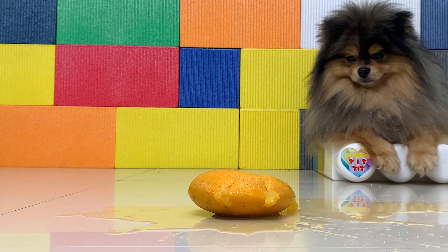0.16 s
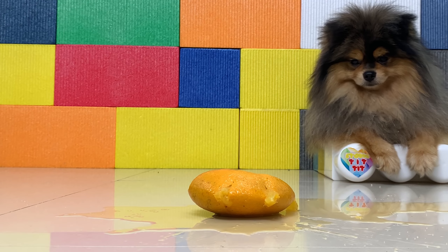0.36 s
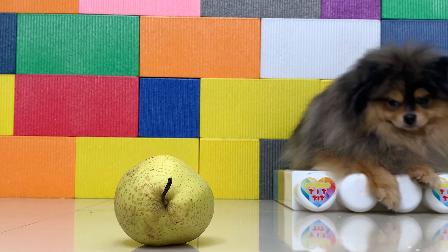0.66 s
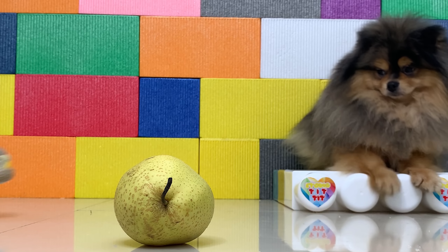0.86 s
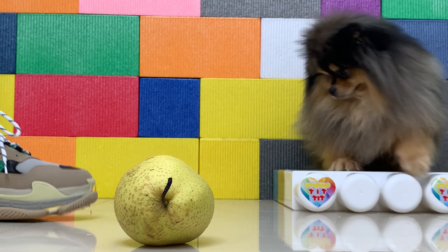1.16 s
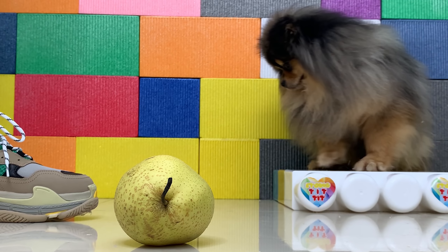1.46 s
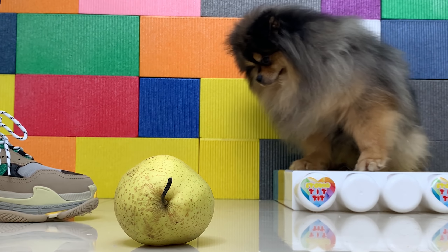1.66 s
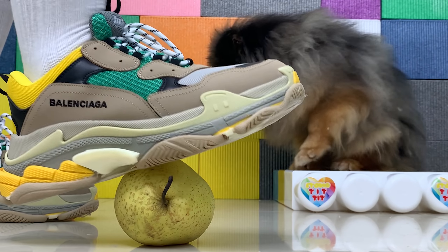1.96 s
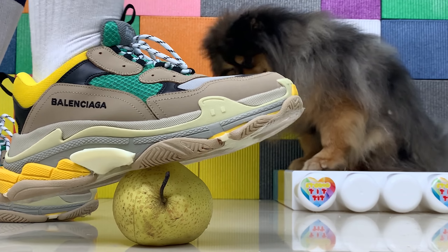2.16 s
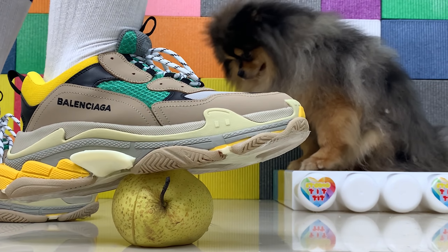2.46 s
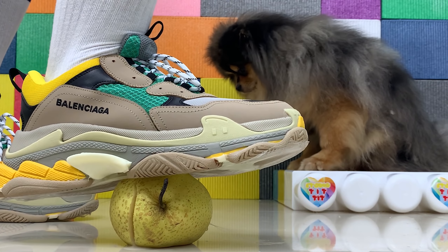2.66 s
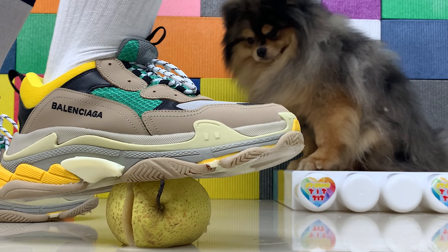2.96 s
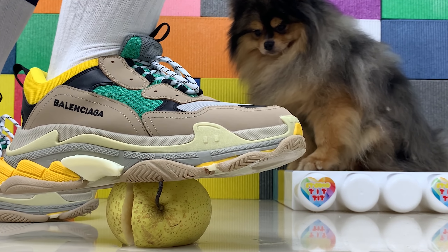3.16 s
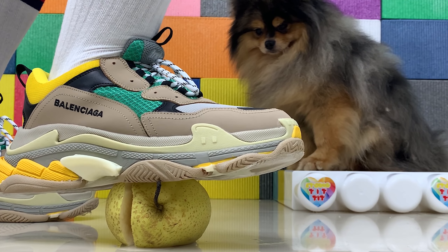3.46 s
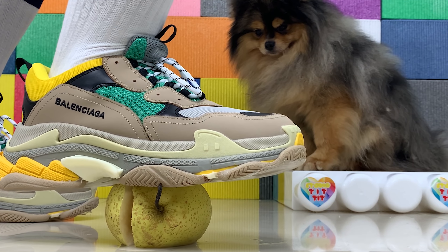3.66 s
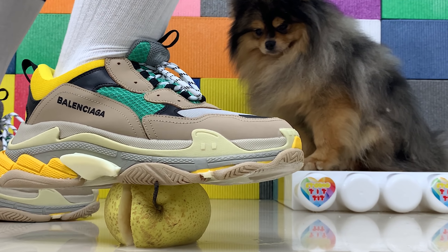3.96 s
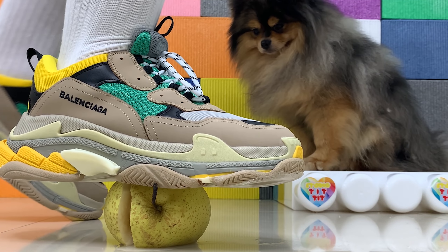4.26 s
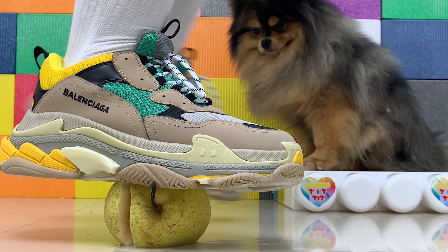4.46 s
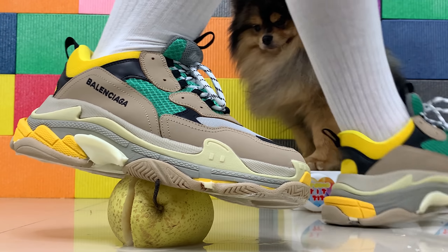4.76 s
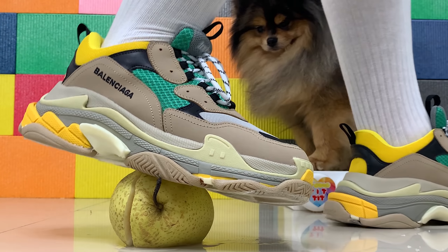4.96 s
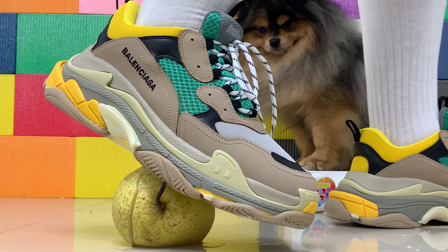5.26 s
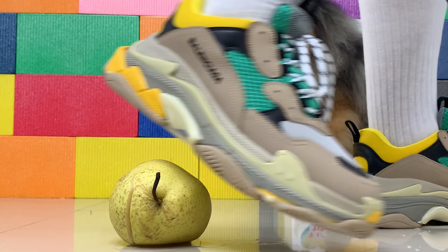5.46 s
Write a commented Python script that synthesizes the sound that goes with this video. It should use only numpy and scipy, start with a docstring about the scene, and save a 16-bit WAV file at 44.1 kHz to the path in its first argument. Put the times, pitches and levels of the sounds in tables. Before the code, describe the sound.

Soft footsteps and a hard tap, then a crisp fruit cracks and crunches under a shoe in bursts, close up in a live bare room.

```python
"""A thick-soled shoe presses a firm pear on a hard floor, close to the microphones in a live room.
Surges of weight crush the flesh: short pops and noise bursts split it, dense grains crumble and fizz.
A faint juicy fizz comes first, from fine grains; steps, taps and rustling are shaped noise.
Two wavering low tones, a low rumble and a faint hiss lie beneath."""
import sys
import numpy as np
from scipy import signal
from scipy.fft import rfft, irfft, next_fast_len
from scipy.io import wavfile
from scipy.ndimage import map_coordinates

SR = 44100
rng = np.random.default_rng(int(sys.argv[2]) if len(sys.argv) > 2 else 0)


def log_audio(samples):
    """Write samples as a 16-bit WAV file to the path given in sys.argv[1]."""
    # one column per channel
    frames = np.atleast_2d(samples).T
    # limit to full scale, then quantise
    limited = np.clip(frames, -1, 1)
    pcm = np.round(limited * 32767).astype(np.int16)
    wavfile.write(sys.argv[1], SR, pcm)


N = 247786

# Relative dB below: a level that is trimmed, shaped or normalised further on.

# Surges of weight on the fruit. Each row: peak in seconds, rise in seconds, fall in seconds,
# pulp crunch in relative dB, juice fizz in relative dB.
SURGES = [(2.61, 0.089, 0.07, -52.5, -38), (2.85, 0.06, 0.21, -44.5, -38.5),
          (3.01, 0.15, 0.04, -47.5, -40.5), (3.44, 0.026, .025, -61, -50.5), (3.72, 0.019, 0.012, -44, -42),
          (3.94, 0.021, 0.077, -47.5, -42.5), (4.05, 0.023, .02, -46.5, -48),
          (4.18, 0.03, 0.087, -57, -52.5), (4.73, 0.0235, 0.13, -42.5, -36.5),
          (4.86, 0.029, 0.024, -39.5, -34), (4.99, .02, 0.039, -49, -57)]
# Full load between these times, ramped outside them.
LOAD_FULL_S, LOAD_END_S, LOAD_RAMP_S = 2.45, 5.1, 0.2


def pressing(load_pulp_rel_db=-63.5, load_juice_rel_db=-59):
    """Gains of pulp crunch and juice fizz: a steady load with surges of weight on top."""
    t = np.arange(N) / SR
    inside_s = np.minimum(t - LOAD_FULL_S, LOAD_END_S - t)
    loaded = np.clip(1 + inside_s / LOAD_RAMP_S, 0, 1)
    steady = amp([[load_pulp_rel_db], [load_juice_rel_db]])
    return loaded * np.sqrt(steady ** 2 + swells(SURGES))


# Loudest splits in the flesh. Each row: centre in seconds, pop in relative dB, pop pitch in Hz,
# bursting cells in relative dB, tearing time in seconds.
CRACKS = [(2.603, -40.5, 2310, -31, .0015), (2.6368, -39, 2880, -30.5, .0009),
          (2.693, -41, 2780, -34, .0008), (2.7195, -64, 3190, -38, .001), (2.7412, -31, 2480, -28, 0.0018),
          (2.7549, -18.5, 4230, -22.5, 0.00047), (2.7658, -25.5, 3030, -25.5, 0.00087),
          (2.799, -35.5, 2640, -33.5, 0.0011), (2.8296, -21, 2500, -20.5, 0.00028),
          (2.8366, -19.5, 2480, -20.5, 0.0023), (2.846, -28, 2400, -26, 0.0013),
          (2.8567, -22, 2180, -19.5, .0015), (2.8854, -17, 4220, -21, 0.001),
          (2.8906, -29, 3720, -28.5, .0008), (2.932, -30.5, 2500, -33, 0.0016),
          (2.9566, -28.5, 2320, -43.5, .0014), (2.97, -31.5, 2200, -31.5, 0.00065),
          (3.017, -34, 3150, -32, 0.00045), (3.078, -38, 2300, -39, 0.0021),
          (3.2731, -44, 2290, -37.5, 0.00061), (3.3375, -39, 2220, -35, 0.001),
          (3.5446, -23.5, 2270, -24.5, 0.0011), (3.554, -29.5, 2570, -28, 0.0011),
          (3.7151, -44, 1780, -41.5, .001), (3.837, -37, 2970, -33, 0.00061),
          (3.9082, -40, 2710, -38, 0.0038), (3.9236, -34.5, 2160, -39, 0.0008),
          (4.0598, -37, 2300, -40, 0.0053), (4.2899, -44.5, 1700, -48.5, 0.0017),
          (4.383, -44, 3320, -42.5, 0.0016), (4.5381, -43, 1870, -43, 0.00043),
          (4.6017, -41.5, 3010, -39, 0.00062), (4.6317, -32, 2030, -37, .0015),
          (4.694, -48, 2190, -38, 0.0019), (4.7273, -28, 2550, -37, 0.0015),
          (4.7472, -27.5, 1780, -29, 0.00073), (4.773, -31.5, 1300, -27.5, 0.0016),
          (4.8027, -26, 2800, -25, 0.00062), (4.8253, -34.5, 1880, -24, 0.00091),
          (4.8384, -23, 2540, -17.5, 0.00085), (4.8516, -26.5, 3770, -22.5, 0.00096),
          (4.8581, -27, 1970, -28.5, 0.0019), (4.8816, -23.5, 1600, -26, .0025),
          (4.9079, -23, 2750, -19.5, 0.00082)]


def cracks(press, pop_db=-3, cells_db=0, small_pop_db=2, small_cells_db=3.0, scatter_db=6,
           small_hz=2300, small_tear_s=0.0004, count=320):
    """The big splits, plus small ones at random times whose levels follow the pressure."""
    rows = [(s, db + pop_db, hz, burst_db + cells_db, tear_s) for s, db, hz, burst_db, tear_s in CRACKS]
    times = rng.uniform(LOAD_FULL_S - LOAD_RAMP_S, LOAD_END_S + LOAD_RAMP_S, count)
    traits = np.tanh(rng.standard_normal((count, 4)))
    for s, (size, pitch, wet, length) in zip(times, traits):
        now = min(int(s * SR), N - 1)
        crunch_db, fizz_db = 20 * np.log10(press[:, now] + 1e-9)
        db = crunch_db + small_pop_db + scatter_db * size
        burst_db = fizz_db + small_cells_db + scatter_db * (size + wet) / 2
        hz = small_hz * np.exp(0.45 * pitch)
        rows.append((s, db, hz, burst_db, small_tear_s * np.exp(length / 2)))
    out = np.zeros((2, N))
    for s, *shape in rows:
        sound = crack(*shape)
        add(out, s - sound.shape[1] / 2 / SR, sound)
    return out


# Spectrum of bursting cells. Each row: frequency in Hz, level in relative dB.
CELLS = [(1500, -11), (3500, -2), (5000, -3), (6500, -2), (8200, -1), (10000, -1.5), (13000, -4.5),
         (16000, -6.5)]


def crack(db, hz, burst_db, tear_s, cycles=1.107, rise_share=0.7, skirt_db=-19, skirt_s=0.0053,
          tint_hz=7000, tint_db=2):
    """A split races through a cluster of cells; the freed flesh springs apart with a short pop."""
    t = (np.arange(1024) - 512) / SR
    sign, place = rng.choice([-1, 1]), rng.standard_normal()
    age_s = np.maximum(t + 0.74 / hz, 0)
    pop_envelope = (hz * age_s) * np.exp(-np.e * hz * age_s / cycles)
    pop = unit(np.sin(2 * np.pi * hz * age_s) * pop_envelope)
    # main tear: a sharp noise burst, with a weaker noise skirt that swells in and dies away
    steepness = 2 * t / tear_s / np.where(t < 0, rise_share, 1)
    tearing = 1 / np.cosh(np.clip(steepness, -20, 20))
    tearing = tearing + amp(skirt_db) * np.exp(-np.abs(t) / skirt_s)
    # each cluster has its own colour
    own_hz = tint_hz * np.exp(1.24 * place)
    tint = lambda f: 1 + amp(tint_db) * band(f, own_hz, own_hz / 3)
    bursts = filtered(tearing * rng.standard_normal((2, len(t))), tint)
    cells = off_floor(coloured(spread(bursts), CELLS))
    to_level = np.sqrt(88 / len(t))  # levels as if all energy fell within 2 ms
    return to_level * (sign * amp(db) * pop + amp(burst_db) * cells)


def off_floor(x, delay_s=0.0003214, bounce_db=-7):
    """A copy bounces off the floor; its delay, drawn per burst, notches the spectrum."""
    late_s = delay_s * np.exp(0.473 * rng.standard_normal())
    gain = amp(bounce_db)
    return filtered(x, lambda f: (1 + gain * np.exp(-2j * np.pi * f * late_s)) / np.hypot(1, gain))


# Spectrum of crushed pulp. Each row: frequency in Hz, level in relative dB.
PULP = [(100, -32.5), (400, -24), (900, 5.5), (1300, -1), (1800, 7), (2500, 4.5), (3300, -8), (4500, -21.5),
        (7000, -11.5)]
# Spurts of juice through crumbling flesh. Each row: centre in seconds, half length in seconds,
# level in relative dB.
SPURTS = [(2.627, 0.0069, -42.5), (2.665, 0.0077, -39.5), (3.012, 0.007, -37), (3.818, 0.03, -49),
          (4.693, 0.014, -38), (4.835, 0.0025, -34)]


def crushing(press, pulp_db=-7, juice_db=-4.0, spurt_pulp_db=-9, clump_db=1.0, clumps_per_second=130,
             crumble_db=-15, crumble_rise_s=0.0059, crumble_fall_s=0.0091):
    """Under pressure cells give way in clumps and juice fizzes; the crackle swells at each big split."""
    t = np.arange(N) / SR
    crumbs = swells([(s, crumble_rise_s, crumble_fall_s, db + crumble_db, burst_db + crumble_db)
                     for s, db, _, burst_db, _ in CRACKS])
    crunch, fizz = np.sqrt(press ** 2 + crumbs)
    clumps = amp(clump_db * map_coordinates(rng.standard_normal(4096), [t * clumps_per_second]))
    spurt = sum(amp(db) * np.exp(-((t - s) / half_s) ** 2) for s, half_s, db in SPURTS)
    pulp_gain = amp(pulp_db) * crunch + amp(spurt_pulp_db) * spurt
    pulp = pulp_gain * grains(PULP, per_second=1800, scatter_db=3.5)
    juice = amp(juice_db) * fizz * grains(CELLS, per_second=5400, scatter_db=5.5)
    spray = spurt * grains(CELLS, per_second=6700, scatter_db=0.5)
    return clumps * (pulp + juice) + spray


# Resonances of the split's hollow. Each row: time in seconds, then first, second and third
# resonance in Hz.
HOLLOW = [(2.95, 2230, 4130, 7740), (3.35, 1710, 3900, 8200), (4.5, 1760, 2800, 7900),
          (4.75, 1560, 2860, 6400)]
# Shape of those three resonances. Each row: width in Hz, gain in dB.
HOLLOW_RING = [(300, 0.5), (550, -10.5), (900, -7.5)]


def hollow(x):
    """The widening split lends its shifting resonances to everything that bursts inside it."""
    out = np.zeros_like(x)
    t, times = np.arange(N) / SR, np.transpose(HOLLOW)[0]
    for (s, *pitches), mine in zip(HOLLOW, np.eye(len(HOLLOW))):
        ring = lambda f: 1 + sum(amp(db) * band(f, hz, width_hz)
                                 for hz, (width_hz, db) in zip(pitches, HOLLOW_RING))
        out += filtered(x * np.interp(t, times, mine), ring)  # crossfade between rows
    return out


# Level difference of the ports. Each row: frequency in Hz, left over right in dB.
LEFT_BIAS = [(100, -2), (700, 0.5), (2200, 1), (4400, 3.5), (8000, 0.5), (15000, -0.5)]
# Phase difference of the ports. Each row: frequency in Hz, lead of left in radians.
LEFT_PHASE = [(1000, 0), (1550, .55), (2800, -.8), (3500, -1.1), (4700, -2.6), (6400, -6.1), (11000, -6.4),
              (15600, -6.9)]


def ports(x):
    """Two microphone ports hear the fruit with different strength and phase."""
    half = np.array([[0.5], [-0.5]])
    log_ratio = lambda hz: np.log(amp(along(LEFT_BIAS, hz))) + 1j * along(LEFT_PHASE, hz)
    return filtered(x, lambda hz: np.exp(half * log_ratio(hz)))


# Spectrum of fine juice bubbles. Each row: frequency in Hz, level in relative dB.
FOAM = [(1500, -14), (5000, -5), (8000, 0.5), (10000, 1.5), (13000, 2), (16000, -21)]
# Larger bubbles. Each row: peak in seconds, level in dB.
BUBBLES = [(0.297, -44), (.427, -43), (0.438, -42)]


def foam(full_s=0.28, end_s=0.39, rise_s=0.097, fall_s=0.096, foam_db=-56,
         bubble_rise_s=0.0006, bubble_fall_s=0.0029):
    """Tiny bubbles of juice burst, high and fine, with a few larger ones among them."""
    t = np.arange(N) / SR
    slope = np.minimum((t - full_s) / rise_s, (end_s - t) / fall_s)
    fizz = amp(foam_db) * np.exp(np.minimum(0, slope))
    bursts = sum(amp(db) * swell(s, bubble_rise_s, bubble_fall_s) for s, db in BUBBLES)
    return fizz * grains(FOAM, per_second=2700, scatter_db=5.5) + bursts * noise(FOAM)


# Soft blows of sole and fruit on the floor. Each row: start in seconds, peak in dB, pitch in Hz.
STEPS = [(1.063, -32, 980), (1.22, -49.5, 1430), (1.252, -58, 1010), (1.26, -40, 360), (1.622, -41, 900),
         (1.731, -41.5, 920), (1.897, -40.5, 358), (1.913, -38, 630), (1.954, -42.5, 394), (2.01, -53, 600),
         (2.125, -45.5, 700), (3.869, -42, 340), (4.06, -46, 348), (4.631, -38, 344), (4.777, -41, 300),
         (4.882, -24, 1260), (4.919, -39, 315), (5.411, -44, 745)]


def steps(t60_s=0.019, attack_s=0.0032, sharpness=4.3, step_db=0, overtone=2.0, overtone_db=-13):
    """Soft landing: a brief noise push through a broad resonance and a weaker one above it."""
    out, t = np.zeros(N), np.arange(SR // 8) / SR
    for s, db, hz in STEPS:
        push = rng.standard_normal(len(t)) * (1 - np.exp(-t / attack_s)) * amp(-60 * t / t60_s)
        low = lambda f: band(f, hz, hz / sharpness)
        high = lambda f: amp(overtone_db) * band(f, overtone * hz, overtone * hz / sharpness)
        thud = filtered(push, lambda f: (low(f) + high(f)) / (1 + 1j * f / (2 * hz)))
        add(out, s, amp(db + step_db) * thud / np.abs(thud).max())
    return np.array([out, out])


# Movements of legs and feet. Each row: peak in seconds, rise in seconds, fall in seconds,
# cloth rustle in relative dB, sole shuffle in relative dB.
MOVES = [(.04, 0.033, 0.084, -68.5, -58.5), (.13, 0.025, 0.32, -58, -60.5), (.43, 0.099, 0.057, -52, -77),
         (1.25, 0.046, 0.11, -59, -54.5), (1.44, 0.22, 0.12, -55.5, -75), (1.745, 0.018, 0.16, -53, -56.5),
         (1.95, 0.038, 0.23, -61.5, -52), (2.04, .013, 0.047, -56.5, -67), (3.88, 0.026, 0.22, -59, -57.5),
         (4.9, 0.13, 0.16, -64, -52.5), (5.36, 0.051, 0.23, -64.5, -72)]
# Spectrum of cloth. Each row: frequency in Hz, level in relative dB.
CLOTH = [(300, 6.5), (900, 7), (2000, 2.5), (4000, 3.5), (6500, -2), (8800, 1.5), (12500, -7),
         (16000, -3.5)]
# Spectrum of shuffling soles. Each row: frequency in Hz, level in relative dB.
SHUFFLE = [(120, -2.5), (250, 1.5), (450, -2), (800, -13), (1500, -23), (4000, -42)]


def rustling(press, rustle_db=0, shuffle_db=-1, still_cloth_db=-76, still_sole_db=-70, strain_db=-17):
    """Cloth whispers and soles shuffle with each movement; the sole also strains as it presses."""
    still = amp([[still_cloth_db], [still_sole_db]])
    cloth, sole = np.sqrt(swells(MOVES) + still ** 2)
    sole = np.hypot(sole, amp(strain_db) * press[0])
    rustle = amp(rustle_db) * cloth * grains(CLOTH, per_second=5000, scatter_db=5.0)
    return rustle + amp(shuffle_db) * sole * noise(SHUFFLE)


# Sharp taps further off in the room. Each row: start in seconds, peak in relative dB.
TAPS = [(.055, -40), (1.064, -48.5), (1.493, -38), (1.7315, -20.5), (1.915, -34), (2.11, -46.5),
        (2.145, -43.5), (2.371, -42), (5.34, -41)]
# Spectrum of a tap. Each row: frequency in Hz, level in relative dB.
TAP = [(300, 3.5), (900, -13.5), (1700, 4.5), (3200, -9), (5000, -5.5), (9000, -1.5), (16000, -7)]


def taps(t60_s=0.041, tap_db=-2):
    """Hard little contacts: coloured noise that dies quickly."""
    out, t = np.zeros((2, N)), np.arange(SR // 16) / SR
    for s, db in TAPS:
        hit = rng.standard_normal((2, len(t))) * amp(-60 * t / t60_s)
        tap = coloured(spread(hit), TAP)
        add(out, s, amp(db + tap_db) * tap / np.abs(tap).max())
    return out


# Colour of the room's answer. Each row: frequency in Hz, level in relative dB.
ROOM_COLOUR = [(100, -2.7), (600, 1.5), (1200, 0.6), (1800, -0.2), (3000, 1.4), (5000, 2.3), (6800, -5),
               (8200, 0.3), (9500, -3.5), (15000, 0.4)]
# Decay of the room. Each row: frequency in Hz, 60 dB decay time in seconds.
ROOM_DECAY = [(150, 1), (1000, 0.44), (3000, 0.83), (8000, .7), (15000, 0.45)]


def room(x, early_db, late_db, early_t60_s=0.055):
    """Floor, shoe and near wall scatter the sound at once; the bare room rings on."""
    hz, t, z = signal.stft(rng.standard_normal((2, SR)), SR, nperseg=256)
    decay = amp(-60 * t / along(ROOM_DECAY, hz)[:, None])
    tail = signal.istft(z * decay, SR, nperseg=256)[1][:, :SR]
    t = np.arange(SR) / SR
    late = tail * (1 - np.exp(-t / 0.0029))
    early = rng.standard_normal((2, SR)) * amp(-60 * t / early_t60_s) * (1 - np.exp(-t / 0.0019))
    answer = amp(early_db) * coloured(spread(early), ROOM_COLOUR)
    answer = answer + amp(late_db) * coloured(spread(late), ROOM_COLOUR)
    # the left channel alone drives both sides
    return signal.fftconvolve(x[:1], answer / np.sqrt(SR), axes=1)[:, :N]


# Level of the drone, fading early on. Each row: time in seconds, level in relative dB.
DRONE = [(0, -56), (.2, -51), (.55, -50.5), (.85, -61.5), (2.5, -62.5), (5.62, -64.5)]
# Tones of the drone. Each row: pitch in Hz, width in Hz, level in relative dB.
DRONE_TONES = [(57.5, 8.8, -2), (167.7, 9.1, -8.5)]


def drone():
    """Two wavering low tones: noise through narrow resonances."""
    tone = lambda hz, width_hz: unit(filtered(rng.standard_normal(N), lambda f: band(f, hz, width_hz) ** 2))
    tones = sum(amp(db) * tone(hz, width_hz) for hz, width_hz, db in DRONE_TONES)
    return amp(curves(DRONE)[0]) * tones


# Level of the low rumble. Each row: time in seconds, level in relative dB.
RUMBLE_LEVEL = [(0, -51.5), (.75, -63.5), (1.1, -53), (1.6, -55.5), (2.8, -55.5), (3.2, -57), (3.6, -66.5),
                (3.95, -52.5), (4.4, -57), (4.85, -51), (5.62, -57.5)]
# Spectrum of the rumble. Each row: frequency in Hz, level in relative dB.
RUMBLE = [(15, -40), (24, -8.5), (36, -3), (55, -1.5), (75, 0), (97, -1), (125, 1.5), (170, 1),
          (230, -13.5), (400, -19.5), (900, -45.5)]
# Spectrum of the hiss. Each row: frequency in Hz, level in relative dB.
HISS = [(200, 10.5), (1000, 4.5), (4000, -8), (16000, -27.5)]


def background(rumble_db=-2.0, hiss_db=-69.5):
    """Room rumble as low noise of varying level, plus a faint steady hiss."""
    rumble = amp(rumble_db + curves(RUMBLE_LEVEL)[0]) * noise(RUMBLE)
    return rumble + amp(hiss_db) * noise(HISS)


def amp(db):
    """Decibels to gain."""
    return 10 ** (np.asarray(db) / 20)


def unit(x):
    """Scale to rms 1."""
    return x / np.sqrt(np.mean(x ** 2) + 1e-20)


def along(points, hz):
    """Read (Hz, value) points on a log axis."""
    f, v = np.transpose(points)
    return np.interp(np.log(hz + 1), np.log(f + 1), v)


def curves(rows):
    """One value per sample for each column after the time."""
    s, *cols = np.transpose(rows)
    return [np.interp(np.arange(N) / SR, s, c) for c in cols]


def filtered(x, response):
    """x times a response of frequency."""
    n = x.shape[-1]
    m = next_fast_len(2 * n)
    return irfft(rfft(x, m) * response(np.fft.rfftfreq(m, 1 / SR)), m)[..., :n]


def band(f, hz, width_hz):
    """Response of one resonance, 1 at its centre."""
    return 1j * f * width_hz / (hz * hz - f * f + 1j * f * width_hz)


def coloured(x, spectrum):
    """x shaped by a spectrum, at rms 1."""
    return unit(filtered(x, lambda hz: amp(along(spectrum, hz))))


# Likeness of left and right. Each row: frequency in Hz, correlation from 0 to 1.
ALIKE = [(50, 0.9), (150, 0.73), (600, 0.49), (1200, 0.12), (2500, 0.45), (4500, 0.2), (8000, 0.6),
         (15000, .6)]


def spread(pair):
    """Blend two signals into left and right, with a likeness that depends on frequency."""
    turn = lambda hz: np.arccos(np.clip(along(ALIKE, hz), -1, 1)) / 2
    mid, side = filtered(pair, lambda hz: np.array([np.cos(turn(hz)), np.sin(turn(hz))]))
    return np.array([mid + side, mid - side])


def noise(spectrum):
    """Smooth stereo noise of rms 1."""
    return coloured(spread(rng.standard_normal((2, N))), spectrum)


def grains(spectrum, per_second, scatter_db):
    """Stereo crackle of rms 1: random tiny bursts, a few larger than the rest."""
    size_db = scatter_db * np.minimum(rng.exponential(size=(2, N)), np.pi)
    sizes = amp(size_db) * rng.choice([-1, 1], (2, N))
    struck = rng.random((2, N)) < per_second / SR
    return coloured(spread(sizes * struck), spectrum)


def swell(s, rise_s, fall_s):
    """A gain that grows to 1 at time s and dies away again."""
    t = np.arange(N) / SR - s
    return np.exp(-np.minimum(np.abs(t) / np.where(t < 0, rise_s, fall_s), 20))


def swells(rows):
    """Summed power of (s, rise s, fall s, dB, dB) swells, one curve for each level column."""
    power = np.zeros((2, N))
    for s, rise_s, fall_s, *levels_db in rows:
        power += amp(levels_db)[:, None] ** 2 * swell(s, rise_s, fall_s) ** 2
    return power


def add(track, s, sound):
    """Mix a sound into a track from time s."""
    i = max(round(s * SR), 0)
    part = track[..., i:i + sound.shape[-1]]
    part += sound[..., :part.shape[-1]]


def scene():
    """The fruit sits near the microphones; steps and taps stir more of the room."""
    press = pressing()
    fruit = hollow(cracks(press) + crushing(press))
    near = fruit + room(fruit, early_db=-8, late_db=-11.5)
    feet, far = steps(), taps()
    around = feet + room(feet, early_db=-6.0, late_db=-5.5)
    around = around + far + room(far, early_db=-3.0, late_db=-2.5)
    return ports(near) + foam() + around + rustling(press) + drone() + background()


def record(dry, low_cut_hz=30, top_hz=16000):
    """Roll off the deepest bass and keep nothing from the band limit up."""
    low_cut = lambda hz: hz ** 4 / np.sqrt(hz ** 8 + low_cut_hz ** 8)
    return filtered(dry, lambda hz: (hz < top_hz) * low_cut(hz))


dry = scene()
out = record(dry)
log_audio(out)
```